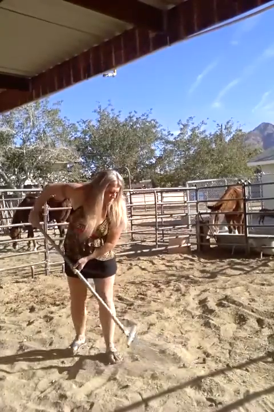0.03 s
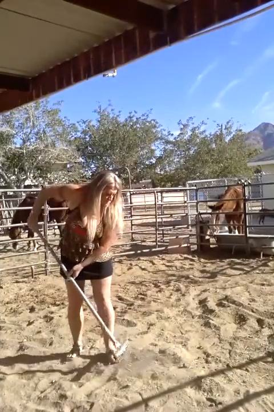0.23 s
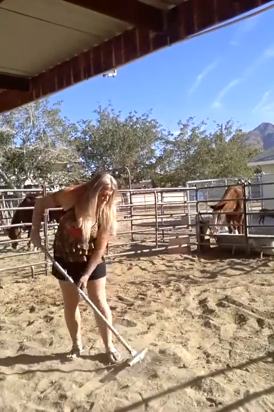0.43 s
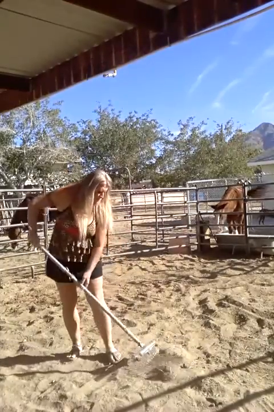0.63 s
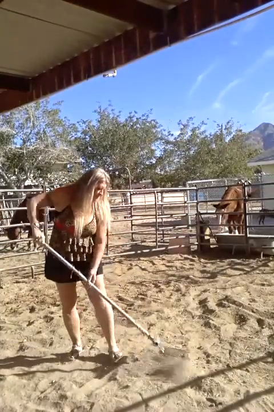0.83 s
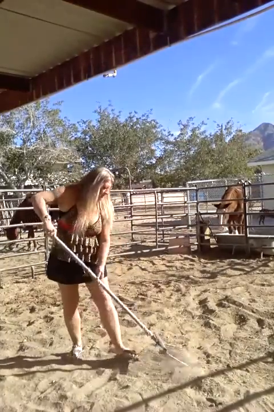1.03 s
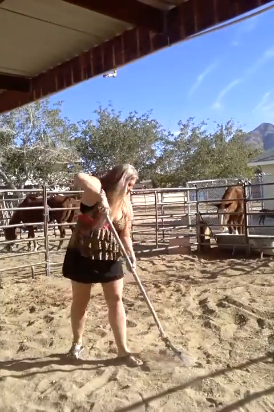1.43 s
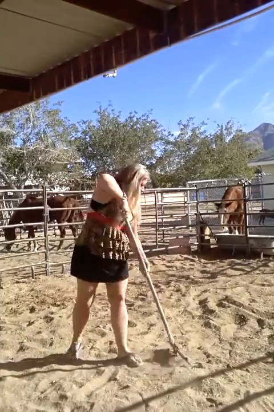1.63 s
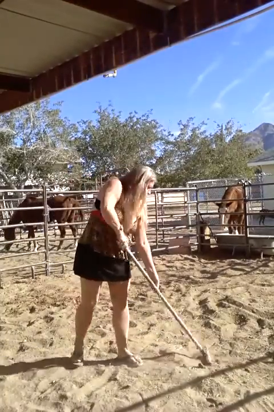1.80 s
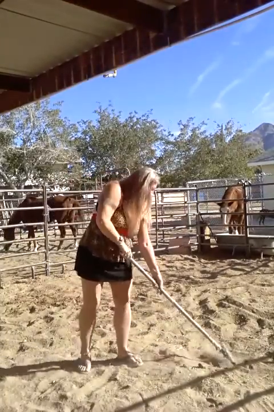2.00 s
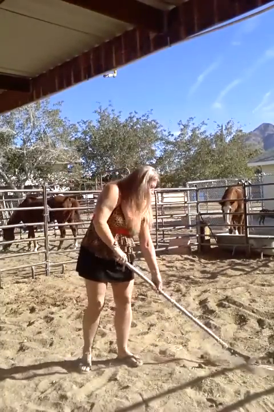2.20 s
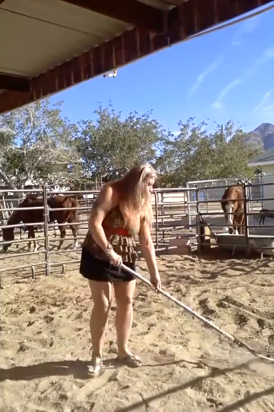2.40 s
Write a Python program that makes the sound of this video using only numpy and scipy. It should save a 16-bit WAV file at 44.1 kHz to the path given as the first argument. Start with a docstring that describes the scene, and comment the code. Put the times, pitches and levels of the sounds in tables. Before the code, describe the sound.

Short, gritty rake strokes drag through sand in an open-air horse pen, a few metres off. The metal tines tick on stones and ring briefly among soft thuds, while a far animal calls faintly at the start and near the end.

```python
"""A low outdoor rumble and a thin hiss of air are heard first, with a faint, far animal call and one chirp.
Then a metal rake is pushed and pulled through dry sand in a horse pen, a few metres from a sheet roof.
Countless grain impacts add up to a crackle and excite the modes of the rake head; stones crack against
it, tines ring as they flick free, and weight thuds on the sand. Ground, rails and roof reflect the rake.
Near the end the far animal calls again in three short notes."""
import sys
import numpy as np
from scipy import signal
from scipy.fft import rfft, irfft, next_fast_len
from scipy.io import wavfile

SR = 44100
rng = np.random.default_rng(int(sys.argv[2]) if len(sys.argv) > 2 else 0)


def persist_wave(psi):
    """Save psi, clipped to +-1, as 16-bit WAV."""
    counts = np.round(np.clip(psi, -1, 1) * 32767).astype(np.int16)
    wavfile.write(sys.argv[1], SR, np.atleast_2d(counts).T)


N = 112454
TIME = np.arange(N) / SR
FULL_STROKE_DB = -30   # reference level for the grain rate and the drag rumble


def from_db(db):
    """Amplitude ratio: tenfold for every 20 dB."""
    return 10 ** (np.asarray(db) / 20)


def rms_one(x):
    """Normalisation to unit mean power."""
    return x / np.sqrt(np.mean(x ** 2) + 1e-20)


def at_hz(points, hz):
    """Interpolation of a table on a log-frequency axis."""
    f, value = np.transpose(points)
    return np.interp(np.log(hz + 1), np.log(f), value)


def drift(rate_hz):
    """Low-passed noise: a slow random fluctuation of rms 1."""
    r = np.exp(-80 * np.pi * rate_hz / SR)
    slow = signal.lfilter([1], [1, -2 * r, r * r], rng.standard_normal(N // 40 + 2002))[2000:]
    return np.interp(np.arange(N) / 40, np.arange(len(slow)), rms_one(slow))


def ring(x, hz, t60):
    """Damped resonator: a unit impulse starts a sine of height 1 that falls 60 dB in t60 seconds."""
    r, w = from_db(-60 / (t60 * SR)), 2 * np.pi * hz / SR
    return signal.lfilter([0, np.sin(w)], [1, -2 * r * np.cos(w), r * r], x + 1e-18)


def colour(x, gain_at):
    """Linear filtering: the spectrum is multiplied by a gain curve."""
    size = next_fast_len(N + SR // 2)
    return irfft(rfft(x, size) * gain_at(np.fft.rfftfreq(size, 1 / SR)), size)[..., :N]


def shaped(x, spectrum):
    """Spectral shaping by a table of levels, scaled to rms 1."""
    return rms_one(colour(x, lambda hz: from_db(at_hz(spectrum, hz))))


def reflect(x, t60):
    """Diffuse reverberation: convolution with decaying noise of unit energy, different in each ear."""
    t = TIME[:SR // 2]
    tail = rng.standard_normal((2, len(t))) * from_db(-60 * t / t60)
    tail /= np.sqrt(np.sum(tail ** 2, axis=1, keepdims=True))
    return signal.fftconvolve(x[None], tail, axes=1)[:, :len(x)]


# Likeness of left and right. Each row: frequency in Hz, correlation from 0 to 1.
COHERENCE = [(100, 0.92), (300, 0.88), (1500, 0.33)]

def diffuse_pair(mid, side):
    """Spatial coherence: long waves reach both ears alike, short ones less so."""
    common = colour(mid, lambda hz: np.sqrt(1 + at_hz(COHERENCE, hz)))
    opposed = colour(side, lambda hz: np.sqrt(1 - at_hz(COHERENCE, hz)))
    return common + opposed * [[1], [-1]]


# Spectra of the rumble and the air. Each row: frequency in Hz, relative spectral density in dB.
RUMBLE_SPECTRUM = [(28, -26.5), (65, -1), (130, 0.5), (190, -5), (300, -11), (700, -21), (2500, -40)]
AIR_SPECTRUM = [(3000, -3), (5500, 1), (7000, 12), (8500, -8), (15000, -0.5)]

def outdoors(hiss, rumble_db=-52.5, drag_db=-47.5, air_db=-63):
    """Incoherent sources add in power: the rumble grows as the rake drags, under a steady hiss of air."""
    drag = from_db(drag_db) * (hiss / from_db(FULL_STROKE_DB)) ** 0.21
    rumble = shaped(diffuse_pair(*rng.standard_normal((2, N))), RUMBLE_SPECTRUM)
    air = shaped(rng.standard_normal((2, N)), AIR_SPECTRUM)
    return rumble * np.hypot(from_db(rumble_db), drag) + air * from_db(air_db + np.array([[-2], [2]]))


# One long note and three short ones. Each row: start in seconds, length in seconds, pitch in Hz,
# level of the fundamental in dB, level of the octave in dB.
CALL_NOTES = [(-.03, 0.22, 749, -67, -80), (2.326, 0.064, 875, -72, -65), (2.422, 0.066, 880, -70, -65),
              (2.488, 0.07, 884, -66, -61)]

def far_animal(waver=.014):
    """Frequency modulation: a voice of two harmonics wavers by a small fraction of its pitch."""
    out = np.zeros(N)
    for start, length, hz, fundamental_db, octave_db in CALL_NOTES:
        phase = 2 * np.pi * np.cumsum(hz * (1 + waver * drift(59))) / SR
        swell = np.sqrt(np.abs(np.sin(np.pi * np.clip((TIME - start) / length, 0, 1))))
        out += swell * (from_db(fundamental_db) * np.sin(phase) + from_db(octave_db) * np.sin(2 * phase))
    return out


# Pitch contour of the chirp. Each row: time in seconds, frequency in Hz.
CHIRP_CONTOUR = [(0.009, 3880), (0.029, 5750), (0.068, 3770)]

def bird(level_db=-62):
    """A pure tone glides up and down; its phase is the integral of its frequency."""
    times, hz = np.transpose(CHIRP_CONTOUR)
    swell = np.sin(np.pi * np.clip((TIME - times[0]) / (times[-1] - times[0]), 0, 1))
    phase = 2 * np.pi * np.cumsum(np.interp(TIME, times, hz)) / SR
    return from_db(level_db) * swell * np.sin(phase)


# Strokes of the rake. Each row: start, deepest bite and lift in seconds, hiss envelope at the deepest
# bite in dB, swell up to it in dB, release in dB per second, grit envelope relative to the hiss in dB.
RAKE_STROKES = [(0.128, 0.193, 0.2, -49, 8, 230, -2), (0.236, 0.32, 0.33, -36.5, 4.5, 202, -15.5),
                (0.345, 0.405, 0.55, -27.5, 9.5, 129, -9), (0.846, 0.847, 0.83, -51.5, 2.5, 131.5, -16),
                (1.103, 1.209, 1.21, -44, 3.5, 338.5, -14), (1.268, 1.329, 1.473, -41.5, 7, 300, -13.5),
                (1.644, 1.654, 1.706, -39, 0, 153, -13), (1.732, 1.803, 1.84, -29.5, 4.5, 208, -16),
                (1.854, 1.918, 1.931, -36, 2.5, 200, -14), (2.024, 2.082, 2.08, -51, 2.5, 273, -4.5),
                (2.145, 2.157, 2.192, -36.5, 7.5, 241, -15.5), (2.215, 2.213, 2.202, -42.5, 3, 134, -3)]

def stroke_envelopes(attack_s=0.027, skim_db=-10, skim_db_per_s=339, judder_db=1.1, judder_hz=32):
    """Ploughing friction: the tines skim, bite, pile up sand and lift, juddering as they go."""
    hiss, crunch = np.zeros((2, N))
    for start, deepest, lift, db, swell_db, release_db_per_s, grit_db in RAKE_STROKES:
        before, after = np.maximum(start - TIME, 0), np.maximum(TIME - lift, 0)
        attack_db = skim_db * np.minimum(before / attack_s, 1) - skim_db_per_s * before
        depth_db = np.interp(TIME, [start, deepest, lift], [-swell_db, 0, -swell_db])
        bite = from_db(db + attack_db + depth_db - release_db_per_s * after)
        hiss = np.hypot(hiss, bite)
        crunch = np.hypot(crunch, bite * from_db(grit_db))
    judder = from_db(judder_db * drift(judder_hz))
    return hiss * judder, crunch * judder


def grains(level, full_stroke_per_s=14000, spread_db=2.5):
    """Shot noise of rms 1: grains click at random, and a harder stroke sets more of them moving."""
    chance = np.clip(full_stroke_per_s / SR * np.sqrt(level / from_db(FULL_STROKE_DB)), .02, 1)
    sizes = from_db(spread_db * np.minimum(rng.exponential(1, N), 5)) * rng.choice([-1, 1], N)
    return rms_one(sizes * (rng.random(N) < chance) / np.sqrt(chance))


# Spectra of fine sand and coarse grit. Each row: frequency in Hz, relative spectral density in dB.
SAND_SPECTRUM = [(1200, -18.5), (2100, -4.5), (3200, -6), (4500, 0.5), (7800, -0.5), (10000, -6),
                 (14000, -13)]
GRIT_SPECTRUM = [(80, -10), (500, -2.5), (690, 1.5), (950, -1), (1800, 4.5), (3000, -14.5)]

def sand(hiss, crunch, fine_gain_db=2):
    """Superposed impacts: fine sand hisses and coarse grit crunches past the tines."""
    fine = from_db(fine_gain_db) * hiss * shaped(grains(hiss), SAND_SPECTRUM)
    coarse = crunch * shaped(grains(hiss), GRIT_SPECTRUM)
    return fine + coarse


# Modes of the rake head. Each row: frequency in Hz, relative level in dB, 60 dB decay time in seconds.
HEAD_MODES = [(1840, -6, 0.076), (2186, -1.5, 0.027), (2850, -5.5, 0.02), (4320, -0.5, 0.032),
              (6120, 3.5, 0.062), (7270, 7, 0.016), (7790, -0.5, 0.021)]

def rake_head(hiss, rub_db=-15.5, wander_db=5.5, knock_db=-30.5):
    """Modal resonance: grains and stones ring the head; each mode's share wanders as other tines dig in."""
    times, stone_db, _ = np.transpose(STONE_STRIKES)
    out = np.zeros(N)
    for hz, mode_db, t60 in HEAD_MODES:
        rubbing = grains(hiss) * from_db(wander_db * drift(4.0))
        rubbed = from_db(rub_db) * hiss * rms_one(ring(rubbing, hz, t60))
        knocks = np.zeros(N)
        knocks[(times * SR).astype(int)] = from_db(stone_db + knock_db) * rng.standard_normal(len(times))
        out += from_db(mode_db) * (rubbed + ring(knocks, hz, t60))
    return out


# Stereo balance of the rake. Each row: frequency in Hz, level of left over right in dB.
RAKE_BALANCE = [(100, 6), (1300, 4.5), (4000, 4.5), (8100, -7)]

def pen(x, scatter_db, scatter_t60_s=0.052, renew_s=.07, roof_db=-15.5, roof_t60_s=0.63):
    """Scattering: reflections off ground and rails shift as the rake moves; the roof adds a faint tail."""
    roof = from_db(roof_db) * reflect(x, roof_t60_s)
    step = int(renew_s * SR)
    scatter = np.zeros((2, N))
    for centre in range(0, N + step, step):
        near = np.arange(max(centre - step, 0), min(centre + 2 * step, N))
        crossfade = np.sqrt(np.clip(1 - np.abs(near - centre) / step, 0, 1))
        scatter[:, near] += reflect(x[near] * crossfade, scatter_t60_s)
    direct = np.array([x, np.interp(TIME - .0001, TIME, x)])   # the right ear hears it 0.1 ms later
    both = (direct + from_db(scatter_db) * scatter + roof) / np.sqrt(1 + from_db(scatter_db) ** 2)
    return colour(both, lambda hz: from_db(at_hz(RAKE_BALANCE, hz) * np.array([[.5], [-.5]])))


# Tines striking stones. Each row: start in seconds, peak at the source in dB, centre frequency in Hz.
STONE_STRIKES = [(0.163, -36, 11100), (0.286, -23, 8060), (.362, -14.5, 8050), (0.41, -33, 693),
                 (0.568, -23.5, 2620), (0.573, -32.5, 1110), (0.73, -34.5, 8500), (1.104, -25, 3840),
                 (1.195, -27.5, 8600), (1.652, -29, 4970), (1.789, -16, 10000), (1.816, -11, 4200),
                 (1.814, -34, 1550), (1.827, -17, 4540), (1.974, -31, 1370), (2.15, -16, 6630),
                 (2.21, -25, 5200)]

def stones(decay_s=0.0021, relative_bandwidth=0.41):
    """Hard impact: a brief contact gives a broad band of noise, pitched by the size of the stone."""
    out = np.zeros(N)
    edge = 1 + relative_bandwidth / 2
    for start, db, hz in STONE_STRIKES:
        burst = rng.standard_normal(N) * (TIME >= start) * np.exp(-np.abs(TIME - start) / decay_s)
        band = signal.butter(1, [hz / edge, hz * edge], "band", fs=SR, output="sos")
        crack = signal.sosfilt(band, burst + 1e-18)
        out += from_db(db) * crack / np.abs(crack).max()
    return out


# The rake and footsteps landing on sand. Each row: start in seconds, level in dB.
SAND_THUDS = [(.178, -33.5), (0.665, -33), (1.159, -35.5), (1.323, -35), (1.412, -37), (1.467, -36),
              (1.647, -39), (1.984, -38.5), (2.055, -34), (2.299, -39.5), (2.379, -41)]

def thuds(body_hz=119, t60_s=0.0415, push_decay_s=0.0053):
    """Soft impact: weight landing on sand excites a low, heavily damped resonance."""
    push = np.zeros(N)
    for start, db in SAND_THUDS:
        envelope = (TIME >= start) * np.exp(-np.abs(TIME - start) / push_decay_s)
        push += from_db(db) * envelope * rng.standard_normal(N)
    bass_band = signal.butter(2, [60, 260], "band", fs=SR, output="sos")
    body = signal.sosfilt(bass_band, ring(push, body_hz, t60_s))
    return body / np.abs(body).max() * from_db(max(db for _, db in SAND_THUDS))


# The rake catching. Each row: centre in seconds, half length in seconds, level in dB, pitch in Hz.
CATCH_TONES = [(0.468, 0.012, -36, 1815), (0.478, 0.065, -38, 1815), (0.53, 0.1, -55, 690),
               (0.255, 0.035, -48, 1830)]

def catches(waver=.004):
    """Friction-driven vibration: the rake sings while it catches, its notes wavering together."""
    wavering_time = np.cumsum(1 + waver * drift(38)) / SR
    out = np.zeros(N)
    for centre, half_length, db, hz in CATCH_TONES:
        swell = np.exp(-((TIME - centre) / half_length) ** 2)
        out += from_db(db) * swell * np.sin(2 * np.pi * hz * wavering_time)
    return out


# Tines flicking free of the sand. Each row: start in seconds, level in dB, pitch in Hz.
TINE_FLICKS = [(0.253, -30, 12100), (0.311, -30, 7300), (.846, -49.5, 4366), (1.104, -41, 8100),
               (1.176, -34.5, 4750), (1.267, -41, 8090), (1.329, -45, 11400), (1.408, -35, 7730),
               (2.158, -35.5, 2860)]

def tines(t60_s=.13):
    """Free vibration: a released tine rings at its natural frequency and decays exponentially."""
    out = np.zeros(N)
    for start, db, hz in TINE_FLICKS:
        age = np.maximum(TIME - start, 0)
        out += from_db(db - 60 * age / t60_s) * np.sin(2 * np.pi * hz * age)
    return out


def scene():
    """Superposition of the rake in the pen, far animals heard through the trees, and the outdoor air."""
    hiss, crunch = stroke_envelopes()
    scraping = pen(sand(hiss, crunch) + rake_head(hiss), scatter_db=8.5)
    contacts = pen(stones() + tines(), scatter_db=3)
    singing = pen(catches(), scatter_db=-12)
    animals = far_animal() + bird()
    landings = thuds()
    animal_echo = from_db(-3) * reflect(animals, t60=0.18)
    return outdoors(hiss) + animals + animal_echo + scraping + contacts + landings + singing


def record(dry):
    """Band limiting: a steep low-pass filter removes the treble above 14.7 kHz."""
    return signal.sosfilt(signal.ellip(12, .1, 80, 14700, fs=SR, output="sos"), dry)


dry = scene()
out = record(dry)
persist_wave(out)
```